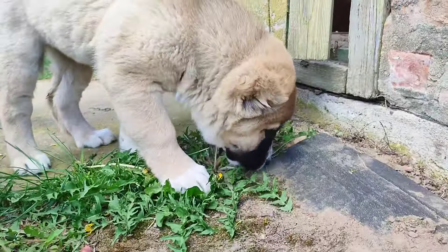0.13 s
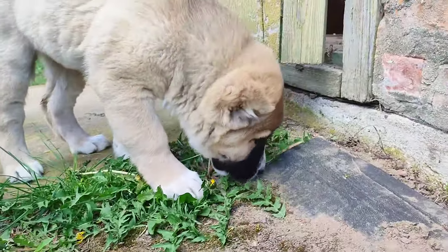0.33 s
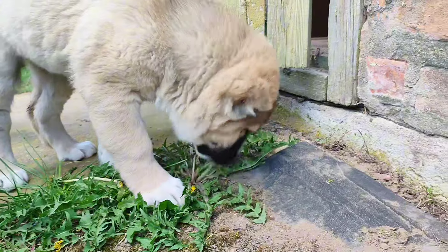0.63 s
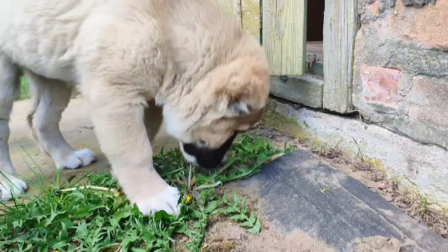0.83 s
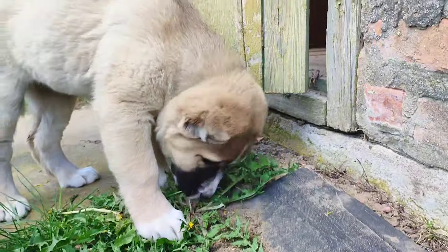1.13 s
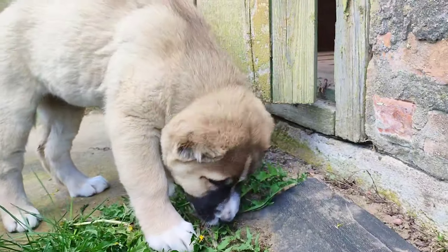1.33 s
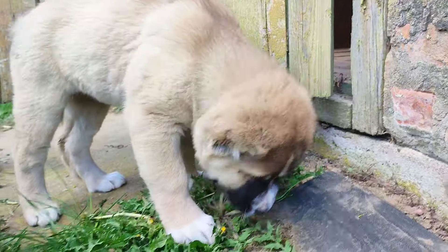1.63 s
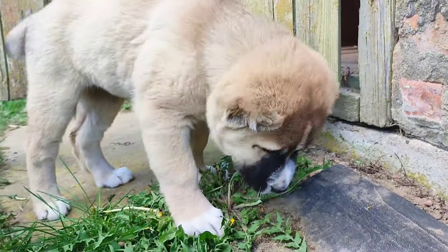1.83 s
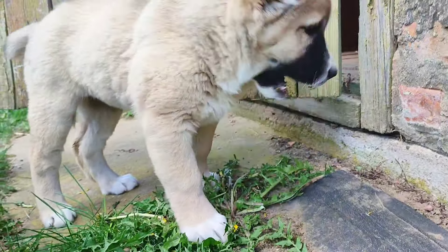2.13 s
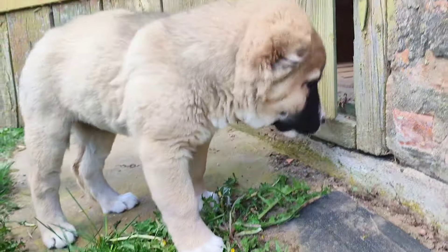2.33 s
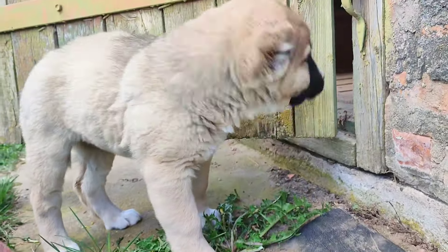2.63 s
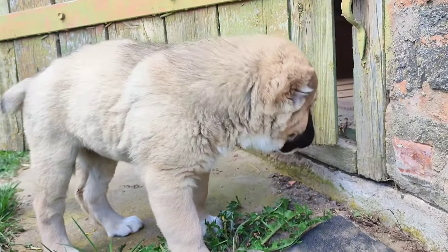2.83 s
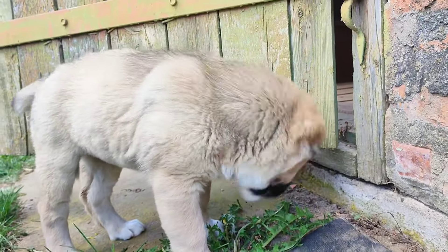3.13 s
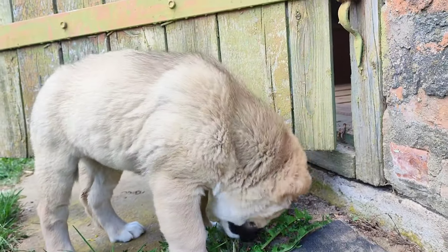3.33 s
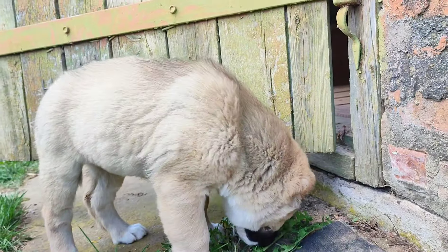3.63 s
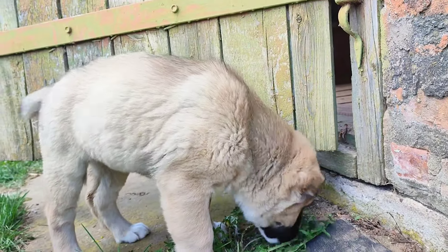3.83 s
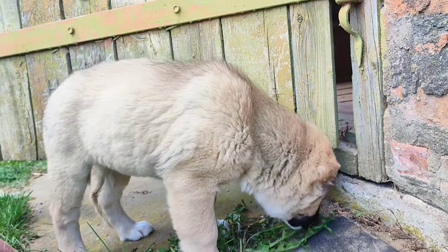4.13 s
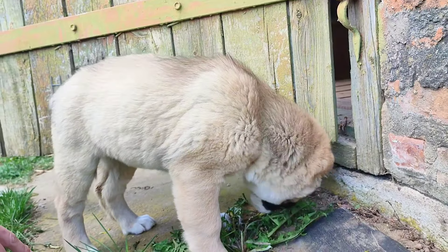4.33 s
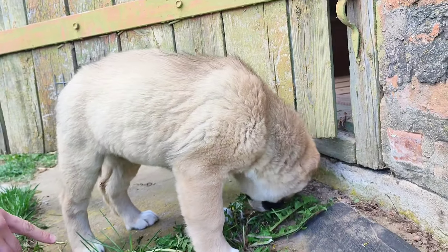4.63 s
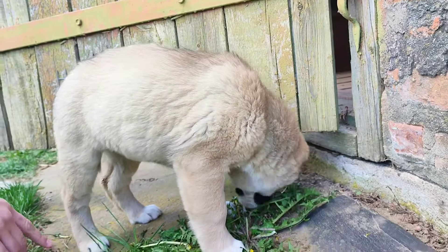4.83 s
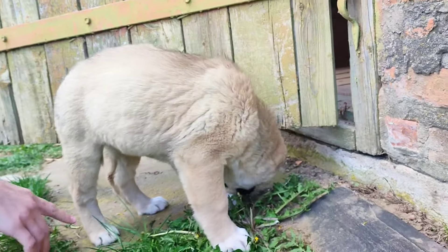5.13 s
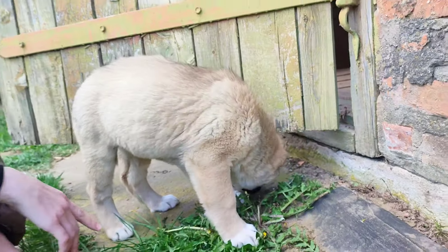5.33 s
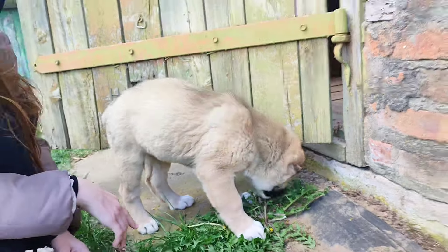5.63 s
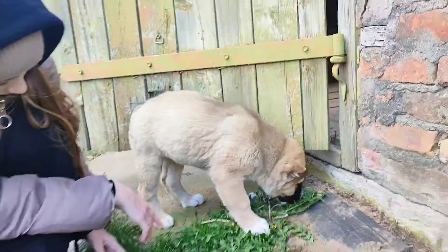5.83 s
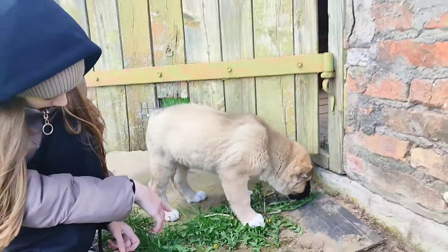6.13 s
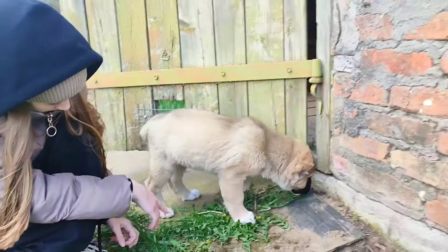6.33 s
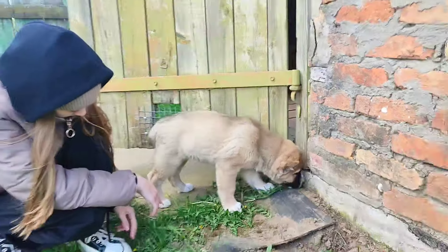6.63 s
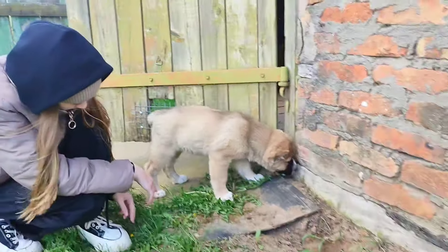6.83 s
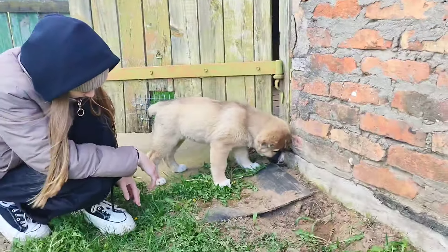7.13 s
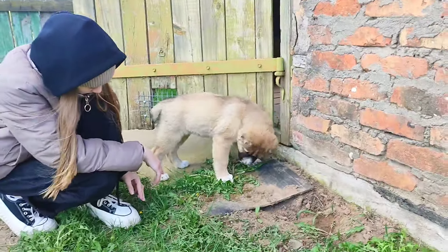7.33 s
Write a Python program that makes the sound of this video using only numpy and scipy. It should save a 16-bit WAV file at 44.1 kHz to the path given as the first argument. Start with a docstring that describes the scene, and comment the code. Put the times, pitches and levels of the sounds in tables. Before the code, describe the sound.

A puppy roots through short grass in a still yard. Light hissing brushes and small dry ticks come irregularly, with soft low bumps and dull rubbing from the hand holding the microphone. Handling thickens from one second, with a tiny low judder, and peaks near two with a strong scrape and click. Firm thumps follow at 3.3 and 4.25, then it thins to faint rustle. Close, dry, low-level rumble beneath.

```python
"""A quiet yard, heard from a hand-held phone while fingers and sleeves rub and knock it.
Sleeves and leaves brush close by in hissing strokes of filtered friction noise, with small dry ticks:
coloured bursts of noise. Soft bumps of the shifting grip are swelling, sagging sines with a dull scuff.
Faint rustle, flicking blades, hand rubbing and one low judder fill in; still air, its rumble and
the hollow wash of the yard are coloured noise underneath."""
import sys
import numpy as np
from scipy import signal
from scipy.fft import rfft, irfft, next_fast_len
from scipy.io import wavfile

SR = 44100
rng = np.random.default_rng(int(sys.argv[2]) if len(sys.argv) > 2 else 0)


def digitize_waveform(pressure):
    """Quantize a signal to 16-bit integers and store it at the path in sys.argv[1].

    Rows of a 2-D input are taken as channels; values are limited to [-1, 1].
    """
    field = np.atleast_2d(pressure).T
    bounded = np.clip(field, -1, 1)
    quanta = np.round(bounded * 32767).astype(np.int16)
    wavfile.write(sys.argv[1], SR, quanta)


N = 329868

# restlessness of the hand: time_s, level_db (before each layer's own offset)
GRIP_LEVEL = [(0.0, -55), (0.75, -54), (1.2, -49), (1.9, -61.5), (2.13, -45.5), (2.3, -51.5), (2.72, -58),
              (2.92, -52.5), (3.6, -63.5), (3.98, -51.5), (4.17, -65), (4.32, -51.5), (4.68, -63.5),
              (5.25, -57.5), (5.8, -64.5), (5.92, -66), (6.7, -67.5), (7.48, -61.5)]
# dull rubbing of skin on the case, shared by grip and stroke drag: freq_hz, density_db (dB per Hz)
RUBBING_COLOUR = [(30, 3.5), (100, -3), (170, -3), (250, 2), (320, 3), (420, -11.5), (560, -16.5),
                  (800, -29.5), (1500, -56)]
# activity of the leaves between strokes: time_s, level_db (before each layer's own offset)
RUSTLE_LEVEL = [(0.0, -61.5), (0.24, -60.5), (0.45, -74), (0.65, -73.5), (1.17, -59), (1.32, -73),
                (1.58, -67), (2.15, -66.5), (2.4, -60), (2.74, -77), (3.28, -63.5), (3.6, -70.5),
                (4.55, -62), (5.4, -59.5), (5.62, -50), (6.15, -67.5), (6.9, -68), (7.48, -71)]
PATTER_RISE_S = 0.0032  # typical rise of a light bump, also the reference rise for the knocks


def from_db(db):
    """Decibels to gain."""
    return np.exp(np.asarray(db) * (np.log(10) / 20))


def rms_one(x):
    """Scale to an rms of one."""
    return x / np.sqrt(np.mean(x ** 2) + 1e-20)


def in_time(rows):
    """A breakpoint curve read at every sample."""
    return np.interp(np.arange(N) / SR, *np.transpose(rows))


def at_hz(points, hz):
    """A spectrum read on a log-frequency axis."""
    freqs, levels = np.transpose(points)
    return np.interp(np.log(hz), np.log(freqs), levels)


def add(track, s, sound):
    """Mix a sound in at time s (seconds)."""
    start = int(np.clip(round(s * SR), 0, N))
    track[start:start + len(sound)] += sound[:N - start]


def drift(rate):
    """Smooth chance that takes about `rate` new values a second; rms one."""
    knots = rng.standard_normal(8192)
    return rms_one(np.interp(np.arange(N) / SR * rate, np.arange(len(knots)), knots))


def coloured(x, db_at):
    """Causal (minimum-phase) filter whose gain in dB is db_at(Hz); the ring-out is kept."""
    size = 2 * next_fast_len((len(x) + 1024) // 2, real=True)
    hz = np.maximum(np.fft.rfftfreq(size, 1 / SR), 1)
    cepstrum = irfft(db_at(hz) * np.log(10) / 20, size)
    # folding the cepstrum onto positive time gives the minimum phase
    causal = np.r_[cepstrum[0], 2 * cepstrum[1:size // 2], cepstrum[size // 2]]
    return irfft(rfft(x, size) * np.exp(rfft(causal, size)), size)


def bed(x, spectrum):
    """A full-length excitation in the given colour; rms one."""
    return rms_one(coloured(x, lambda hz: at_hz(spectrum, hz))[:N])


def patchy(x, depth_db, rate):
    """Each half-octave flickers on its own as the touching fibres change; rms one."""
    hz = np.clip(np.fft.rfftfreq(N, 1 / SR), 700, 16000)
    place = 2 * np.log2(hz / 700)  # half-octaves above 700 Hz
    spectrum, out = rfft(x), 0
    for band in range(10):
        share = np.maximum(0, 1 - abs(place - band))
        out = out + irfft(spectrum * share, N) * from_db(depth_db * drift(rate))
    return rms_one(out)


def friction(per_s, spread_db, smooth_share):
    """Tiny catches of uneven size on top of smooth sliding noise."""
    sizes = from_db(spread_db * np.minimum(rng.exponential(1, N), 4))
    catches = (rng.random(N) < per_s / SR) * sizes * rng.choice([-1, 1], N)
    share = np.clip(smooth_share, 0, 1)
    return np.sqrt(1 - share) * rms_one(catches) + np.sqrt(share) * rng.standard_normal(N)


def contact(x, tilt, peak_hz, peak_db, octaves):
    """Every contact shares one colour and adds a slope and a broad, damped resonance of its own."""
    # body common to all contacts: freq_hz, density_db (dB per Hz)
    shared_colour = [(250, -15.5), (700, 1.5), (1200, 0), (2400, 1), (3200, -1), (4400, 1.5), (5600, -3),
                     (7300, 3), (8600, -5.5), (9700, -12.5), (11800, -7), (15000, -20.5)]

    def db_at(hz):
        slope = tilt * np.log2(np.maximum(hz, 1200) / 5000)  # constant below 1200 Hz, zero at 5 kHz
        hump = 1 / (1 + abs(np.log2(hz / peak_hz) / octaves) ** 3)
        return at_hz(shared_colour, hz) + slope + peak_db * hump
    return coloured(x, db_at)


def air():
    """Still air: steady noise, strongest in the lows."""
    # tone of the air: freq_hz, density_db (dB per Hz)
    air_colour = [(30, -1.5), (140, -13), (280, -9.5), (540, -11.5), (750, -23), (1100, -33), (3300, -37),
                  (7300, -57), (9500, -39), (12000, -41.5), (15500, -45.5)]
    return from_db(-75) * bed(rng.standard_normal(N), air_colour)


def rumble(swing_db=5.0):
    """Low rumble of the air: deep noise whose level wavers within swing_db either way."""
    # course of the rumble: time_s, level_db (before the wavering)
    rumble_level = [(0.0, -72), (0.85, -85), (1.2, -59.5), (2.4, -59), (3.4, -60.5), (5.2, -64.5),
                    (5.8, -65.5), (7.48, -64)]
    # tone of the rumble: freq_hz, density_db (dB per Hz)
    rumble_colour = [(15, -1.5), (25, 1.5), (50, -8), (90, -3), (130, -11.5), (200, -12.5), (400, -48)]
    level_db = in_time(rumble_level) + swing_db * np.tanh(drift(18))
    return from_db(level_db) * bed(rng.standard_normal(N), rumble_colour)


def yard():
    """Faint hollow wash of the yard: noise in narrow humps, restless in level and tone."""
    # course of the wash: time_s, level_db
    yard_level = [(0.0, -83), (1.0, -85.5), (1.6, -78.5), (2.3, -79.5), (4.0, -72.5), (5.3, -81.5),
                  (7.48, -81)]
    # hollow resonances: freq_hz, density_db (dB per Hz)
    yard_colour = [(500, -6), (800, -11), (960, 9), (1090, -13), (1240, 8.5), (1400, -10.5), (1650, 1.5),
                   (2100, -5), (3000, -21.5)]
    stirring = patchy(rng.standard_normal(N), 4, rate=40) * from_db(2.5 * drift(25))
    return from_db(in_time(yard_level)) * bed(stirring, yard_colour)


def grip(trim_db=-3.0):
    """Many small slips of the hand blur into a dull, lumpy rubbing."""
    slips = rng.standard_normal(N) * from_db(4.5 * np.tanh(drift(55)))
    return from_db(in_time(GRIP_LEVEL) + trim_db) * bed(slips, RUBBING_COLOUR)


def rustle(trim_db=-6.5, swell_db=2.0, swells_per_s=16):
    """Light, grainy brushing that comes and goes but never quite stops."""
    # tone of the leaves: freq_hz, density_db (dB per Hz)
    rustle_colour = [(700, -21), (2000, -16), (3300, 0), (4500, 0), (5700, -2.5), (7300, 5.5), (9500, -9),
                     (12300, -4), (14000, -9.5), (16000, -25)]
    grains = patchy(friction(per_s=160, spread_db=3.5, smooth_share=.72), 1.8, rate=130)
    # leaves are touched and left again, with a finer 1 dB flutter
    swells = swell_db * drift(swells_per_s) + drift(60)
    return from_db(in_time(RUSTLE_LEVEL) + trim_db + swells) * bed(grains, rustle_colour)


def blades(per_s=7.3, over_rustle_db=2.0, decay_s=0.0034):
    """Single blades flick free at random: faint, short crackles, louder where the rustle is."""
    flicks, t = np.zeros(N), np.arange(SR // 25) / SR
    flick = np.tanh(2 * t / decay_s) * np.exp(-t / decay_s)
    for moment, size in rng.random((int(per_s * N / SR), 2)):
        add(flicks, moment * N / SR, (.5 + size) * flick)
    noise = rng.standard_normal(N)
    crackle = rms_one(contact(noise, tilt=0.5, peak_hz=1770, peak_db=5, octaves=0.17)[:N])
    return from_db(in_time(RUSTLE_LEVEL) + over_rustle_db) * flicks * crackle


def patter(per_s=11, over_grip_db=11, spread_db=1, centre_hz=259):
    """Light bumps at random moments, stronger while the hand is restless: rows as for bumps."""
    draws = rng.random((int(per_s * N / SR), 4))
    s = draws[:, 0] * N / SR
    db = np.interp(s, *np.transpose(GRIP_LEVEL)) + over_grip_db + spread_db * (2 * draws[:, 1] - 1)
    hz = centre_hz * 2 ** ((draws[:, 2] - .5) / 2)  # a quarter octave either way
    rise = PATTER_RISE_S * (.5 + draws[:, 3])
    return list(zip(s, db, hz, rise))


def bumps(trim_db=-2.0, softness=2.23, sag=0.097):
    """Soft fingers load the case gradually: a bump knocks, swells, sags in pitch and dies in a scuff."""
    # firmer bumps of the grip: start_s, level_db (peak before the trim), pitch_hz (at the crest), rise_s
    firm_bumps = [(0.0979, -43, 250, 0.0064), (0.1704, -30.5, 297, 0.0065), (0.202, -41.5, 404, 0.0022),
                  (0.421, -42, 353, 0.0022), (0.572, -42.5, 253, 0.0053), (0.584, -39, 347, 0.0012),
                  (0.89, -42, 313, 0.0065), (0.9331, -38, 314, 0.0089), (1.1037, -32, 360, 0.0019),
                  (1.218, -34, 327, 0.0024), (1.333, -43, 283, 0.002), (1.396, -39.5, 304, 0.0021),
                  (1.4194, -40.5, 255, 0.0029), (1.6292, -34.5, 267, 0.0096), (1.7848, -30.5, 362, 0.0031),
                  (1.8181, -32.5, 312, 0.0046), (1.8669, -29, 312, 0.0058), (1.9481, -34.5, 280, 0.0041),
                  (2.0656, -29, 333, 0.0027), (2.0845, -32.5, 317, 0.0042), (2.111, -33, 143, 0.0083),
                  (2.1267, -31, 302, 0.0068), (2.1817, -35, 260, 0.0039), (2.1939, -44, 276, 0.0027),
                  (2.3775, -39, 320, 0.0072), (2.499, -38.5, 226, 0.0038), (2.6272, -33.5, 284, 0.0025),
                  (2.709, -41, 198, 0.0055), (3.2337, -37.5, 244.6, 0.0076), (3.3074, -23, 325, 0.002),
                  (3.864, -38, 257, 0.003), (4.1364, -42, 274, 0.0026), (4.2491, -24.5, 287, 0.0035),
                  (4.2795, -31.5, 297, 0.0029), (4.353, -40, 214, 0.0048), (4.5478, -38, 249, 0.0022),
                  (4.999, -42, 245, 0.0055), (5.1191, -39.5, 282, 0.0055), (5.267, -41.5, 269, 0.0052),
                  (5.396, -43.5, 284, 0.0082), (5.728, -40, 316, 0.0063), (6.3519, -42.5, 273, 0.0011),
                  (6.4215, -45, 294, 0.0022), (6.919, -37.5, 264, 0.0022), (7.1029, -40, 310, 0.0031),
                  (7.232, -36.5, 230, 0.0041), (7.431, -32.5, 260, 0.0044)]
    # dull scuff inside a bump: freq_hz, density_db (dB per Hz)
    scuff_colour = [(40, -23.5), (110, 4), (250, 0), (450, -3), (650, -8.5), (900, -24.5), (1400, -36.5),
                    (2500, -37.5)]
    scuff_db, settle_db, settle_s = -17, -20.5, 0.0091  # relative to the bump; the fingers settle after it
    knock_db, knock_hz, knock_s = -23, 626, 0.005  # first touch, for a rise of PATTER_RISE_S; decay time
    swelling, scuffing, knocking = np.zeros(N), np.zeros(N), np.zeros(N)
    t = np.arange(SR // 10) / SR
    scuff = bed(rng.standard_normal(N), scuff_colour)
    one_octave = knock_hz * 2 ** np.array([-.5, .5])
    knock_band = signal.butter(2, one_octave, "band", fs=SR, output="sos")
    knock = rms_one(signal.sosfilt(knock_band, rng.standard_normal(N)))
    rows = firm_bumps + patter()
    phases = rng.uniform(0, 2 * np.pi, len(rows))
    for (s, db, hz, rise), phase in zip(rows, phases):
        load = t / rise * np.exp(1 - t / rise)  # crests at one after the rise time
        turns = np.cumsum(hz * (1 - sag * np.tanh(t / rise - 1))) / SR
        settling = from_db(settle_db) * np.tanh(t / rise) * np.exp(-t / settle_s)
        # a quicker rise knocks harder
        touch = PATTER_RISE_S / rise * np.tanh(2 * t / rise) * np.exp(-t / knock_s)
        add(swelling, s, from_db(db) * load ** softness * np.sin(2 * np.pi * turns + phase))
        add(scuffing, s, from_db(db) * (from_db(scuff_db) * load + settling))
        add(knocking, s, from_db(db + knock_db) * touch)
    return from_db(trim_db) * (swelling + scuffing * scuff + knocking * knock)


def pressure(t, start, length, rise_s=0.0024, fall_s=0.0033, ease_in=0.01, ease_out=0.025):
    """A stroke swells in, holds and dies away; the longer it is, the softer its edges."""
    swell = 1 + np.tanh((t - start) / (rise_s + ease_in * length))
    fade = 1 + np.tanh((start + length - t) / (fall_s + ease_out * length))
    return np.sqrt(swell * fade) / 2


def strokes(drag_db=-59, drag_follows=0.48):
    """Each stroke slides with uneven pressure and fine crackle, over a dull drag."""
    # brushing strokes: start_s, length_s, level_db, tilt_db_per_octave, resonance_hz, resonance_db
    stroke_rows = [(0.126, 0.068, -55.5, 6, 4530, 17), (0.339, 0.07, -62.5, 3.5, 6700, 4),
                   (0.473, 0.096, -60, 5.5, 3700, 10.5), (0.638, 0.025, -57, 8.5, 8350, 13.5),
                   (0.939, 0.057, -59, 8, 3600, 8.5), (1.019, 0.097, -50, 5.5, 3800, 9),
                   (1.103, 0.066, -61.5, 9, 4200, 13), (1.168, 0.069, -48.5, 2, 4050, 9.5),
                   (1.787, 0.023, -61.5, -1, 1160, 19), (1.866, 0.014, -52, 3, 4800, 10.5),
                   (1.935, 0.052, -37.5, 2, 1730, 16), (1.983, 0.053, -41, 5.5, 1800, 15.5),
                   (2.042, 0.035, -53.5, 2, 1970, 7.5), (2.229, 0.016, -51.5, 5, 4740, 9.5),
                   (2.286, 0.6, -68.5, -1.5, 6030, 9), (2.613, 0.015, -48.5, -3, 4600, -4),
                   (3.249, 0.074, -57, 2.5, 4640, 7), (3.847, 0.066, -50, 6.5, 5100, 4),
                   (3.921, 0.098, -57.5, 8.5, 12300, 5.5), (4.354, 0.063, -51.5, 3.5, 2200, 8),
                   (4.532, 0.093, -56, 3.5, 4970, 15), (4.725, 0.086, -58.5, 2, 5050, 18.5),
                   (5.058, 0.024, -57, 4, 7340, 3), (5.217, 0.068, -57, 2, 6300, 6),
                   (5.489, 0.013, -53, 1.5, 2760, 18), (5.539, 0.078, -62, 1, 2250, 2),
                   (5.612, 0.065, -47.5, 4.5, 2100, 9.5), (5.691, 0.067, -55, 8.5, 3200, -7),
                   (5.765, 0.086, -46, 9.5, 5870, 10), (5.852, 0.023, -48.5, 21.5, 6920, 15),
                   (6.021, 0.056, -63, 4, 6950, 0.5), (6.307, 0.057, -60, 4.5, 6100, 4.5),
                   (6.47, 0.0099, -61.5, 4, 1420, 15), (6.71, 0.062, -66, 6, 1590, 16.5),
                   (6.819, 0.087, -61.5, 6, 10200, 1), (7.131, 0.12, -62, 4.1, 7840, 1)]
    hissing, dragging = np.zeros(N), np.zeros(N)
    sliding = patchy(friction(per_s=1100, spread_db=3.0, smooth_share=.55), 3.6, rate=140)
    sliding = sliding * from_db(1.7 * drift(130))
    average_db = np.mean([row[2] for row in stroke_rows])
    for start, length, db, tilt, peak_hz, peak_db in stroke_rows:
        first = max(0, int((start - .04) * SR))
        last = min(N, int((start + length + .08) * SR))
        span = np.arange(first, last)
        pressed = pressure(span / SR, start, length)
        hiss = rms_one(contact(sliding[span], tilt, peak_hz, peak_db, octaves=0.23)[:len(span)])
        hissing[span] += from_db(db) * pressed * hiss
        # the drag follows only a share of the stroke's own level
        dragging[span] += from_db(drag_db + drag_follows * (db - average_db)) * pressed
    return hissing + dragging * bed(rng.standard_normal(N), RUBBING_COLOUR)


def ticks(tail_db=-26, low_cut_hz=850, top_hz=9500, onset_s=0.0017, tail_t60_s=0.081):
    """A short dry crackle with a soft onset and a faint, plain tail."""
    # dry ticks: peak_time_s, level_db (energy spread over 5 ms), burst_t60_s,
    # tilt_db_per_octave, resonance_hz, resonance_db
    tick_rows = [(0.172, -36, 0.026, 7, 3860, 14.5), (0.754, -37.5, 0.0059, 6.5, 8900, 2.5),
                 (0.762, -47, 0.048, 8, 7130, 0.5), (1.6728, -56.5, 0.031, -7, 3940, 14),
                 (1.825, -53, 0.014, 1, 7800, 14), (1.866, -44.5, 0.014, 22.5, 5070, 29),
                 (1.9855, -26.5, 0.008, -13, 1935, 36), (2.2374, -45.5, 0.031, 1.5, 7640, 22),
                 (2.6152, -42, 0.0098, 6, 4560, 7), (2.623, -39.5, 0.0079, -1, 4640, 18),
                 (2.71, -51, 0.06, 1.5, 2140, 1), (3.262, -46, 0.046, -1, 4700, 7.5),
                 (3.3105, -33.5, 0.012, 4, 4760, 13.5), (3.544, -57.5, 0.033, 7, 1560, 31.5),
                 (3.786, -54.5, 0.03, 1, 7400, 14), (4.135, -49.5, 0.062, 5, 1620, 28.5),
                 (4.9211, -51.5, 0.017, 15, 7600, 11), (5.1034, -49, 0.0031, 2, 7880, 18),
                 (5.7322, -40, 0.00066, 8, 3200, 14), (5.7838, -41, 0.0043, 10, 5880, 28.5),
                 (6.4231, -44, 0.027, -0.5, 7000, 7), (6.4236, -36, 0.0051, 5, 2980, 17),
                 (6.9204, -42, 0.029, -4, 1380, 13), (6.9212, -38, 0.015, 7, 2700, 21),
                 (7.359, -54.5, 0.053, 5.5, 2740, 17)]
    out, lead = np.zeros(N), .008  # seconds of fade-in before the peak
    t = np.arange(SR // 16) / SR - lead
    onset, after = np.exp(np.minimum(t, 0) / onset_s), np.maximum(t, 0)
    scatter = np.sqrt(onset) * from_db(-60 * after / tail_t60_s)
    small_body = signal.butter(2, [low_cut_hz, top_hz], "band", fs=SR, output="sos")
    grits = rng.choice([-1, 1], (len(tick_rows), 2, len(t)))
    for (s, db, t60, tilt, peak_hz, peak_db), (grit, dust) in zip(tick_rows, grits):
        steepness = max(1, 2 * np.pi * onset_s / t60)  # shorter bursts fade in faster
        burst = grit * onset ** steepness * from_db(-60 * after / t60)
        snap = signal.sosfilt(small_body, contact(burst, tilt, peak_hz, peak_db, octaves=0.26))
        strength = np.sqrt(np.sum(snap ** 2) / (.005 * SR))
        add(out, s - lead, from_db(db) * snap / strength)
        add(out, s - lead, from_db(db + tail_db) * signal.sosfilt(small_body, dust * scatter))
    return out


def judders(wobble=0.078):
    """A finger sticks and slips across the case at a nearly even rate: a brief low groan."""
    # judders: start_s, end_s, peak_db, slips_hz
    judder_rows = [(1.015, 1.099, -37, 250)]
    out, unevenness = np.zeros(N), drift(148)
    for start, end, db, rate in judder_rows:
        count = max(2, int((end - start) * SR))
        turns = np.cumsum(rate * (1 + wobble * unevenness[:count])) / SR
        add(out, start, from_db(db) * np.hanning(count) * np.sin(2 * np.pi * turns))
    return out


def reflected(x):
    """Nearby surfaces throw the hiss back a few milliseconds late and ripple its spectrum."""
    # reflections from hand, ground and wall: delay_s, level_db
    echo_rows = [(.0014, -29.5), (.0047, -13), (.0076, -22.5)]
    out = x.copy()
    for delay, db in echo_rows:
        add(out, delay, from_db(db) * x)
    return out


def scene():
    """All sources at one close microphone; only the brushing layers are reflected."""
    brushing = reflected(strokes() + rustle() + blades())
    handling = bumps() + judders() + grip()
    background = air() + rumble() + yard()
    return (brushing + ticks() + handling + background)[None]


def record(dry):
    """The top is cut steeply above 15.8 kHz."""
    steep_cut = signal.ellip(10, .1, 70, 15800, fs=SR, output="sos")  # 0.1 dB ripple, 70 dB stop band
    return signal.sosfilt(steep_cut, dry)


dry = scene()
out = record(dry)
digitize_waveform(out)
```